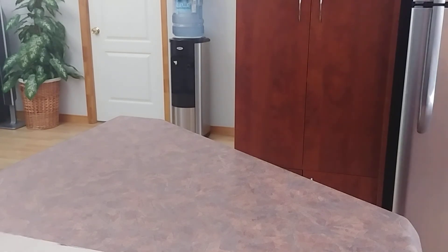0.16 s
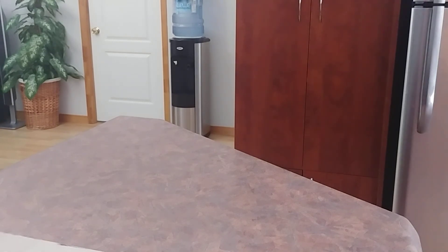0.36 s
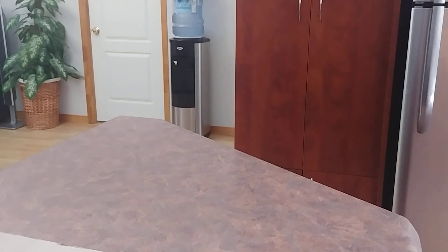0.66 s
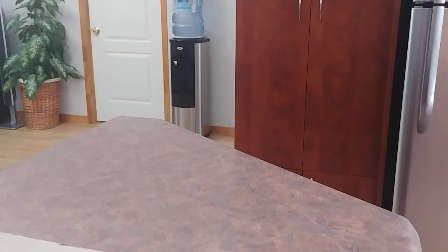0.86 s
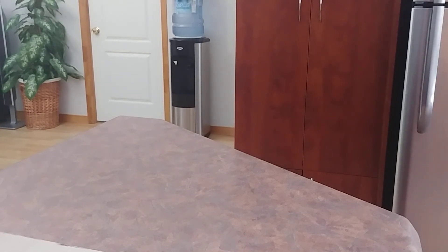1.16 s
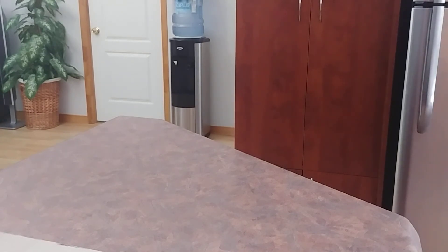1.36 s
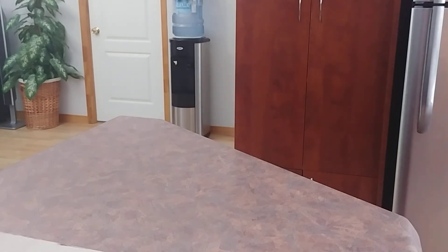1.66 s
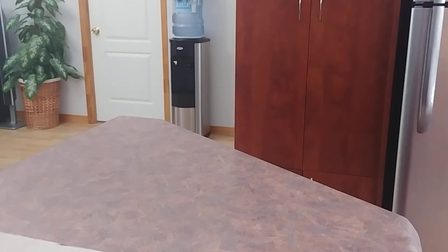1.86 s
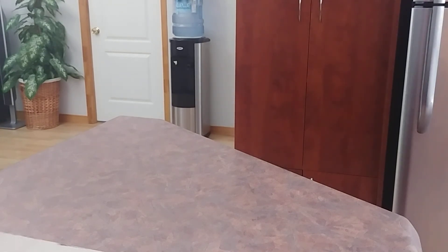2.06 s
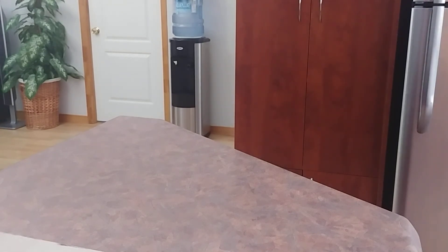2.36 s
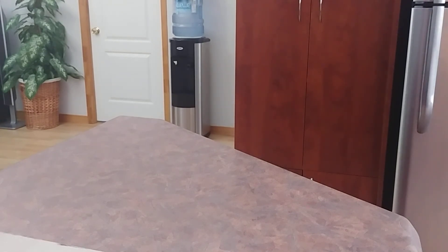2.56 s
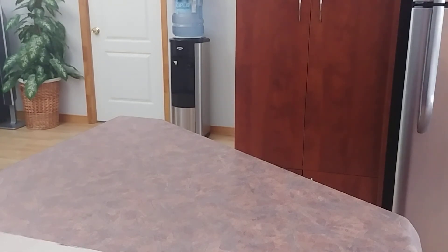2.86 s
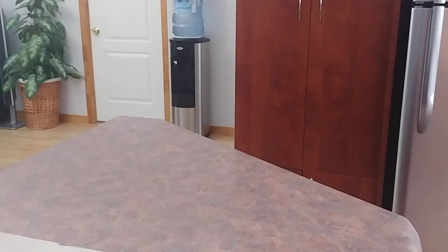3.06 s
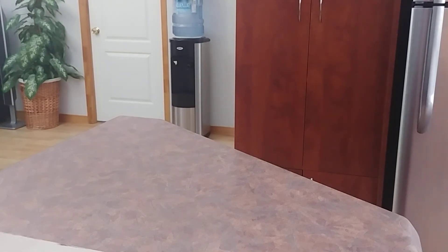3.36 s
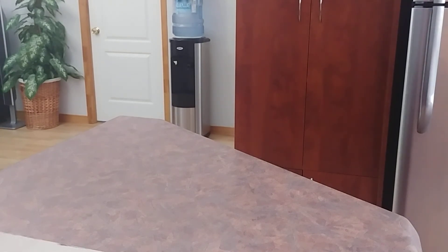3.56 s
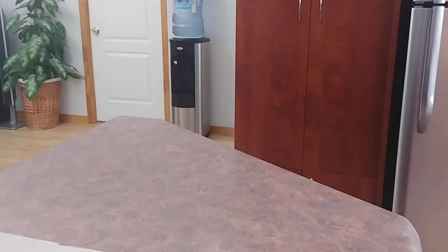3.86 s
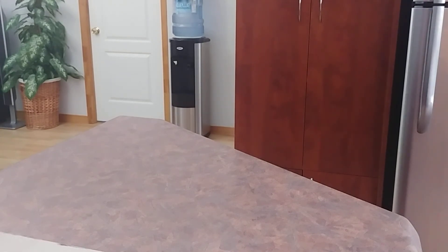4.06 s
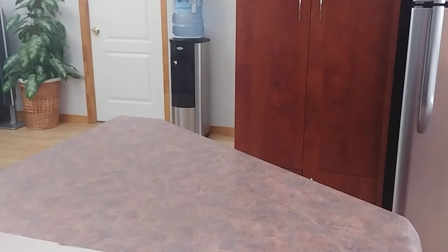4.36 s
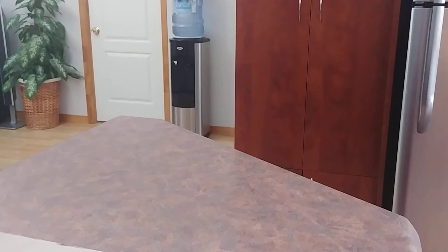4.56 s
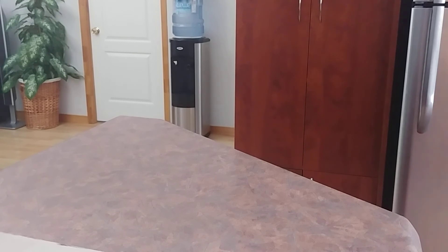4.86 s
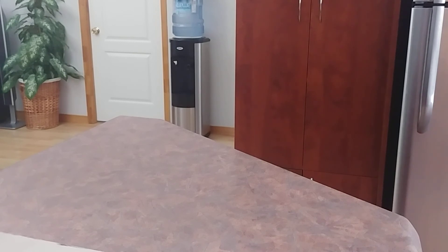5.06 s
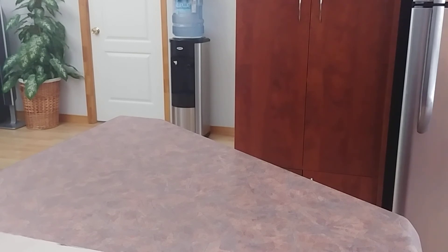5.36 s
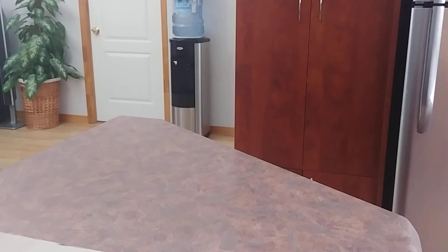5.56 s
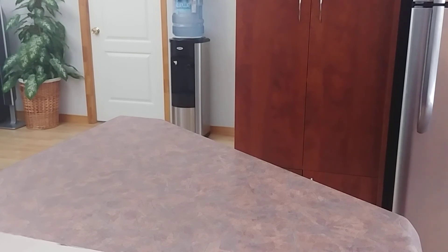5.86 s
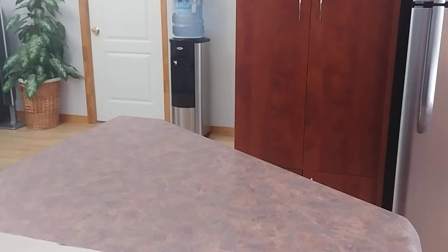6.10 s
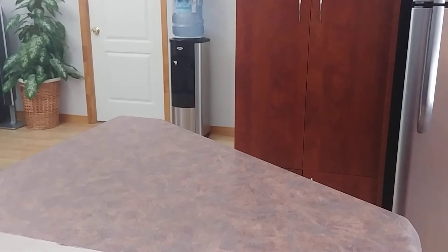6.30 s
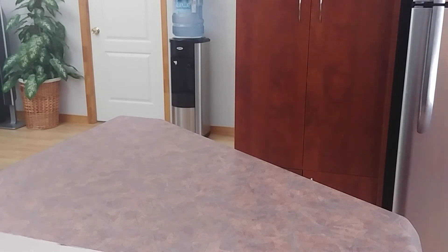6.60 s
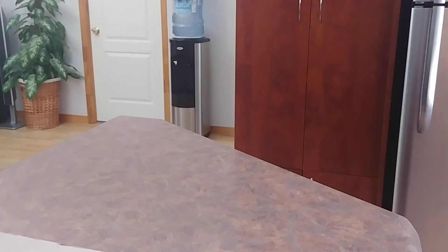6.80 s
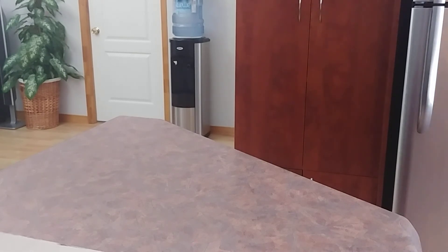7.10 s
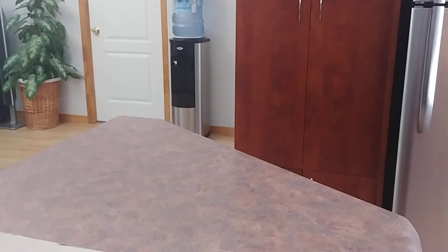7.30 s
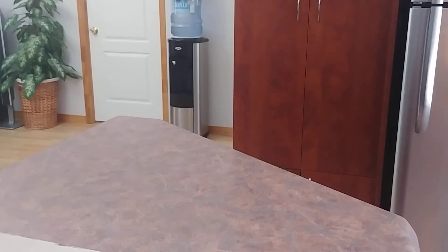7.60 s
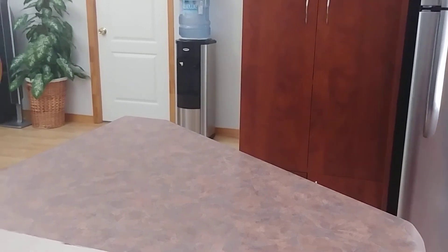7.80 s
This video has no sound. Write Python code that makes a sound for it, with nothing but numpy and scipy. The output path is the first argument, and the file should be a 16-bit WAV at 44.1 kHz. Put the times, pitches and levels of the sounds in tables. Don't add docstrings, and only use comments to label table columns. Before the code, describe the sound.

A thin metal tray is handled and set into an oven, off to the right of a small stereo microphone. Bright foil rustle and small clicks lead to three increasingly strong, rattly clunks with short metallic ringing and dull oven-wall resonance. Friction scrapes and muffled thuds fill the gaps. Afterwards come crackly rustles, a lighter knock and a few soft clacks, with a low compressor hum underneath and modest room reverberation.

```python
import sys
import numpy as np
from scipy import signal
from scipy.fft import rfft, irfft, next_fast_len
from scipy.io import wavfile
from scipy.ndimage import uniform_filter1d

SR = 44100
rng = np.random.default_rng(int(sys.argv[2]) if len(sys.argv) > 2 else 0)


def digitize_waveform(pressure):
    field = np.atleast_2d(pressure).T
    bounded = np.clip(field, -1, 1)
    quanta = np.round(bounded * 32767).astype(np.int16)
    wavfile.write(sys.argv[1], SR, quanta)


def voltage_ratio(level):
    return 10 ** (np.asarray(level, float) / 20)


N = 350154
SIZE = next_fast_len(N, True)
HZ = np.fft.rfftfreq(SIZE, 1 / SR)
TICKS = np.arange(0, N / SR + .01, .001)


def evened(x):
    return x / np.sqrt(np.mean(x ** 2) + 1e-20)


def read(points, hz):
    f, value = np.transpose(points)
    return np.interp(np.log(hz + 1), np.log(f + 1), value)


def colour(x, spectrum):
    return evened(irfft(rfft(x, SIZE) * voltage_ratio(read(spectrum, HZ)), SIZE)[..., :N])


def grains(per_s, spread_db):
    snap_db = spread_db * np.minimum(rng.exponential(1, N), 4)
    size = voltage_ratio(snap_db) * rng.choice([-1., 1.], N)
    return size * (rng.random(N) < per_s / SR)


def ring(modes, spread_db=0., longest=1.8):
    t = np.arange(SR // 2) / SR
    hz, db, t60 = np.transpose(modes)[:, :, None]
    luck = rng.standard_normal((len(modes), 1))
    decay = voltage_ratio(db + spread_db * luck - 60 * t / np.clip(t60, .03, longest))
    h = (decay * np.sin(2 * np.pi * hz * t)).sum(0)
    h = h * np.cos(np.pi * t)
    return h / np.linalg.norm(h)


def sheet():
    place, luck = rng.random((2, 110))
    hz = 620 + 4800 * np.sort(place)
    return ring(np.transpose([hz, -2.5 * hz / 1000, 0.13 + 0.29 * luck]), spread_db=2.0)


def metallic(x, share_db):
    body = np.broadcast_to(sheet(), x.shape[:-1] + (SR // 2,))
    ringing = signal.oaconvolve(x, body, axes=-1)[..., :N]
    return evened(x + voltage_ratio(share_db) * ringing)


def spells(start, db, rise, hold, fall, power=1):
    t = TICKS[:, None]
    early = np.maximum(start - t, 0)
    late = np.maximum(t - start - np.abs(hold), 0)
    away = early / np.maximum(rise, .002) + late / np.maximum(fall, .01)
    events = voltage_ratio(db - 20 * away ** power)
    return (events ** 2).sum(1)


def over_bed(power, bed_db):
    return np.interp(np.arange(N) / SR, TICKS, np.sqrt(power + voltage_ratio(2 * bed_db)))


# (frequency [Hz], correlation [1])
LIKENESS = [(60, 0.84), (150, 0.97), (380, 0.49), (950, 0.37), (2380, -1.7), (5980, 0.2), (15000, -1)]


def diffuse(a, b):
    same = np.clip(read(LIKENESS, HZ), 0, 1)
    a, b = rfft(a, SIZE), rfft(b, SIZE)
    return irfft(np.array([a, same * a + np.sqrt(1 - same ** 2) * b]), SIZE)[:, :N]


# (frequency [Hz], t60 [s])
REVERB = [(100, 0.74), (500, 0.51), (2000, 0.46), (8000, 0.24)]


def room(x, wet_db):
    taps = np.zeros((2, SR // 2))
    at = np.arange(100, SR // 2 - 20, 20)
    at = at + rng.integers(0, 20, (2, len(at)))
    np.put_along_axis(taps, at, rng.choice([-1., 1.], at.shape), 1)
    hz, t, z = signal.stft(taps, SR, nperseg=256)
    decay = voltage_ratio(-60 * t / read(REVERB, hz)[:, None])
    tail = signal.istft(z * decay, SR, nperseg=256)[1]
    tail = diffuse(*tail)[:, :SR // 2]
    tail /= np.linalg.norm(tail[0])
    wet = signal.oaconvolve(np.atleast_2d(x), tail, axes=1)[:, :N]
    return (x + voltage_ratio(wet_db) * wet) / np.sqrt(1 + voltage_ratio(2 * wet_db))


SHAFT_ORDERS = [-56, -65.5, -56.5, -60, -68, -67, -71.5, -82, -95, -91, -73.5, -78.5, -85.5, -80]
# (frequency [Hz], level [dB])
MOTOR_BUZZ = (120, -58.5)
# (frequency [Hz], level per Hz [dB])
AIR_NOISE = [(40, -4.5), (70, -14.5), (125, -14), (200, -5.5), (270, -2), (400, -20.5), (700, -16.5),
             (1300, -42), (2100, -26), (5600, -36.5), (16000, -52)]


def fridge():
    t = np.arange(N) / SR
    shaft_hz = 44.05
    lines = [(shaft_hz * (k + 1), db) for k, db in enumerate(SHAFT_ORDERS)] + [MOTOR_BUZZ]
    hum = np.zeros(N)
    for hz, db in lines:
        waver = np.interp(t, np.arange(90) / 10, rng.standard_normal(90))
        hum += np.sqrt(2) * voltage_ratio(db + 1.6 * waver) * np.sin(2 * np.pi * (hz * t + rng.random()))
    air = colour(diffuse(*rng.standard_normal((2, N))), AIR_NOISE)
    return hum + voltage_ratio(-60) * air


# (time [s], drag level [dB], thud level [dB], rise per 20 dB [s], fall per 20 dB [s])
WEIGHT_SHIFTS = [(.060, -58, -52, 0.075, 0.22), (.405, -55, -38.5, 0.092, 0.076),
                 (.664, -67, -57, 0.4, 0.28), (.932, -67, -46, 0.027, 0.098),
                 (1.514, -37.5, -42.5, 0.018, 0.33), (1.666, -38.5, -40, 0.11, 0.33),
                 (2.070, -41.5, -41, 0.52, 0.53), (2.61, -24, -24, 0.025, .15),
                 (2.760, -33.5, -49, 0.21, 0.21), (2.850, -33.5, -35.5, 0.14, 0.23),
                 (3.215, -51.5, -47, 0.03, 0.95), (3.372, -41.5, -42, 0.25, 0.064),
                 (3.661, -32.5, -26.5, 0.01, 0.3), (3.888, -31, -26.5, 0.051, 0.13),
                 (4.111, -46, -41.5, 0.27, 0.43), (4.693, -60.5, -45.5, 1, 0.98),
                 (5.090, -42, -43.5, 0.15, 0.34), (5.442, -48, -42, 0.36, 0.38),
                 (6.164, -57.5, -46.5, 0.28, 0.21), (6.670, -49.5, -39, 0.092, 0.079),
                 (6.790, -56.5, -44, 0.12, 0.21), (7.350, -54.5, -42.5, 0.25, .12),
                 (7.659, -52, -36.5, 0.052, 0.11), (7.742, -46.5, -37.5, 0.21, 0.11)]


def shifting(column, idle_db):
    rows = np.transpose(WEIGHT_SHIFTS)
    power = spells(rows[0], rows[column], rows[3], 0, rows[4], 1.06)
    return over_bed(power, idle_db)


# (frequency [Hz], level [dB], t60 [s])
FLOOR_MODES = [(61, -2.5, 0.84), (126.7, -6.5, 0.44), (134.2, 9.5, 0.78), (88, -18, 0.28),
               (171.4, -5, 0.335), (250.3, 1.5, 0.23)]


def thuds():
    shaken = signal.oaconvolve(grains(400, 1.94), ring(FLOOR_MODES, longest=0.095))[:N]
    return voltage_ratio(-1.5) * shifting(2, idle_db=-60.5) * evened(shaken)


# (frequency [Hz], level [dB], t60 [s])
WALL_MODES = [(333, -7, 0.6), (350, -1.5, 0.7), (309, -15, 0.6), (265, -11, 0.33)]
# (time [s], level [dB], hold [s], fall per 20 dB [s])
WALL_SPELLS = [
    (1.54, -45, 0.0077, -0.5),
    (1.722, -40.5, 0.23, -0.13),
    (2.086, -48, .01, 0.8),
    (2.625, -33.5, 0.13, 0.24),
    (2.91, -39, .01, 0.3),
    (3.67, -31.5, 0.012, .5),
    (3.896, -42.5, .01, 0.93),
    (4.630, -54.5, 0.0081, 1.4),
    (5.21, -50.5, .01, 0.4),
    (5.456, -51.5, .01, 0.2),
]


def wall():
    shaken = signal.oaconvolve(grains(70, 2.7), ring(WALL_MODES[:3], longest=.8))[:N]
    level = np.sqrt(uniform_filter1d(shaken ** 2, size=6000) + 1e-12)
    s, db, hold, fall = np.transpose(WALL_SPELLS)
    gain = over_bed(spells(s, db, 0.041, hold, fall), -74)
    return voltage_ratio(-4.0) * gain * shaken / level


# (time [s], level
# [dB], frequency [Hz], bandwidth [Hz], t60 [s])
KNOCKS = [(0.106, -49.5, 1410, 220, 0.22), (0.41, -54, 1430, 300, 0.11), (0.767, -39, 3020, 540, 0.12),
          (1.15, -34, 2830, 500, 0.13), (2.488, -43, 2200, 400, .25), (1.772, -46, 4000, 350, 0.22),
          (1.89, -44, 2040, 270, 0.61), (2.17, -47, 2800, 130, 0.56), (2.48, -42, 5270, 500, 0.22),
          (2.612, -29, 2920, 370, .2), (4.93, -38, 3020, 350, 0.44), (7.245, -52, 5050, 900, 0.34),
          (3.868, -23, 2600, 1800, 0.1), (2.15, -49, 3630, 200, 2.), (2.822, -30, 4640, 970, 0.19),
          (1.94, -44.5, 1245, 80, 1.5), (4.48, -54.5, 497, 140, 3.1), (4.265, -41, 1750, 700, 0.3),
          (4.27, -38.5, 3580, 1000, 0.37), (4.40, -41, 4700, 2700, 0.14), (4.902, -37, 9400, 6000, 0.15),
          (5.403, -46.5, 580, 600, 0.39), (6.566, -57.5, 4600, 1200, 0.12), (6.631, -49, 2000, 400, 0.18),
          (6.748, -33.5, 2280, 940, 0.1), (6.777, -45.5, 510, 500, 0.23), (7.593, -45.5, 600, 330, 0.2),
          (7.67, -42.5, 2950, 768, 0.29), (7.79, -46, 3200, 1800, 0.18), (1.51, -32.5, 3500, 1800, .45),
          (3.72, -27, 2400, 1510, .15), (3.872, -28, 3470, 660, .12), (5.639, -46, 5000, 5000, .1),
          (3.886, -30, 150, 120, 0.1), (3.665, -28, 330, 200, 0.23), (0.94, -41, 4860, 700, .2),
          (2.629, -39, 61, 12, 1.4), (3.8, -42, 61.9, 12, 1.5),
          (1.52, -34, 2100, 400, .25), (1.55, -34, 950, 350, .5), (1.70, -45, 1440, 150, 1.),
             (1.83, -48, 2900, 1500, 1.), (1.875, -48, 3600, 400, 0.33), (2.49, -43, 3400, 450, .6),
             (2.825, -33, 1200, 700, .2), (2.85, -36, 2400, 500, .2), (3.88, -32.5, 1375, 150, 0.37),
             (4.19, -50, 1350, 120, .5), (4.345, -56, 1154, 120, .3), (6.775, -46.5, 2400, 900, 0.2),
             (3.655, -25, 829, 60, .45), (3.657, -27, 1390, 130, .4), (3.66, -27, 1700, 70, .4),
             (3.655, -27, 2120, 80, .35), (3.66, -27, 2430, 70, .4), (3.655, -27, 2680, 130, .35),
             (3.658, -25, 150, 90, .2), (3.878, -25, 130, 60, .22), (2.61, -26, 150, 80, .3),
             (1.565, -36, 150, 80, .3), (2.685, -31, 345, 70, .2), (2.594, -30, 3500, 4000, .15),
             (4.62, -61, 650, 350, 1.), (3.262, -40, 4000, 3000, .3), (3.19, -42, 7600, 900, .5)]


def clacks():
    events = KNOCKS
    u, out = np.arange(SR // 3) / SR, np.zeros(N + SR)
    noise = rng.standard_normal((len(events), len(u)))
    for (s, db, hz, width, t60), puff in zip(events, noise):
        band = signal.iirpeak(hz, hz / width, SR)
        knock = evened(signal.lfilter(*band, signal.lfilter(*band, puff)))
        force = voltage_ratio(db - 60 * u / t60) * (1 - np.exp(-u / (0.025 * t60)))
        out[round(s * SR):][:len(u)] += force * knock
    return out[:N]


# (time [s], level [dB], hold [s], relative crackle level [dB])
CRINKLES = [(0.0, -45, 0.0082, -2.5), (0.108, -36, 0.011, -9), (0.253, -55, 0.029, -15),
            (0.394, -52.5, 0.017, -6), (0.59, -47.5, 0.024, -12), (0.761, -45.5, 0.017, -6.5),
            (1.016, -47.5, 0.024, -12), (1.146, -50, 0.12, -3), (1.402, -56.5, 0.023, -1.5),
            (1.503, -37, 0.073, 2.5), (2.486, -48.5, 0.083, 3.5), (2.6, -33.5, 0.041, 7.5),
            (2.826, -37, 0.057, -1), (3.188, -40, 0.015, -10), (3.212, -38, .015, -8),
            (3.653, -33, 0.038, 11), (3.870, -35, 0.034, 5.5), (4.924, -46, 0.037, -35),
            (5.062, -28, 0.0053, -6.5), (5.281, -44, 0.0042, -24), (5.575, -56.5, .005, 0),
            (5.641, -51, 0.04, -8.5), (5.785, -56.5, 0.039, -13), (6.082, -67.5, .04, 4),
            (6.751, -53, 0.029, -13), (7.624, -48, 0.044, -32)]
# (peak time [s], level [dB], swell per 20 dB [s], relative crackle level [dB])
FOLDS = [(.300, -50.5, 0.06, -2.5), (.690, -52, 0.17, -4), (.895, -49, 0.02, -3), (.938, -38, -0.02, -3.5),
         (.975, -50, -0.02, -10), (1.661, -37, 0.0131, 1.5), (1.790, -51, -0.02, 4),
         (1.980, -48.5, 0.04, 7), (2.085, -46.5, 0.07, 8.5), (2.260, -58.5, 0.32, 10.5),
         (2.400, -60, 0.2, 4), (2.92, -36.5, 0.0437, -5), (3.025, -37, 0.0452, -7),
         (3.100, -43.5, 0.04, -5.5), (3.28, -37.5, .04, -1), (3.54, -46.5, 0.06, -3),
         (3.386, -41, 0.06, 3.5), (4.015, -38, 0.1439, -28), (4.120, -42, 0.0235, 1),
         (4.290, -49.5, -0.23, 5), (4.415, -48.5, 0.13, -20), (4.569, -46.5, 0.03, -6.5),
         (4.740, -59.5, 0.1, -17), (4.975, -41, 0.06, 0), (5.030, -36.5, .05, -10), (5.12, -43, 0.04, -1),
         (5.178, -33, 0.0581, -9.5), (5.824, -51.5, 0.0848, -4), (6.164, -58, 0.08, -2),
         (6.670, -56, 0.08, -4), (6.740, -52, 0.08, -25), (7.19, -66.5, .05, -5), (7.237, -52.5, 0.01, -5),
         (7.275, -51.5, 0.03, -3), (7.315, -49.5, 0.03, 1), (7.5, -69, -0.14, 4), (7.725, -55, 0.06, 8),
         (7.816, -54.5, 0.035, 6.5)]
# (time [s], rustle level [dB])
HANDS = [(0.0, -61), (.8, -65.5), (1.08, -76), (1.47, -67.5), (1.53, -47), (1.85, -56), (2.2, -56.5),
         (2.55, -64), (2.7, -46.5), (3.501, -63.5), (3.76, -42.5), (4.48, -61.5), (4.85, -71.5),
         (5.25, -59.5), (5.55, -66), (6.4, -75.5), (7.1, -79), (7.94, -82)]


def fingers(low):
    s, db, hold, low_db = np.transpose(CRINKLES)
    snaps = spells(s, db + low * low_db, 0.015, hold, 0.07)
    s, db, swell, low_db = np.transpose(FOLDS)
    swell = np.maximum(swell, .035)
    creases = spells(s, db + low * low_db, swell, 0, swell, 2.02)
    settling = spells(s, db - 15.5, 0.11, swell, 0.23)
    busy_db = np.interp(TICKS, *np.transpose(HANDS)) + low * 3.5
    return over_bed(snaps + creases + settling, busy_db)


def patchy(x, depth_db):
    z = signal.stft(x, nperseg=256)[2]
    patches = rng.standard_normal(z.shape[:0:-1]).T
    patches = uniform_filter1d(patches, size=4, axis=0)
    patches = uniform_filter1d(patches, size=14, axis=1)
    return signal.istft(z * voltage_ratio(depth_db * evened(patches)), nperseg=256)[1][:, :N]


# (frequency [Hz], level per Hz [dB])
HISS_COLOUR = [(900, -20), (1500, -21.5), (2300, -16.5), (2900, -7), (3800, -7.5), (4800, -2.5),
               (6500, -2.5), (9000, -6), (12000, -14), (16000, -16)]
# (frequency [Hz], level per Hz [dB])
CRACKLE_COLOUR = [(900, -16), (1800, -8.5), (2600, -3), (3800, -4), (5200, -9.5), (7000, -35)]
# (frequency [Hz], level per Hz [dB])
FOIL_COLOUR = [(5000, -30), (8000, -5.5), (11000, -3), (13000, -4.5), (16000, -6)]
# (time [s], level [dB], hold [s])
FOIL_FIZZ = [(0.082, -53, .04), (.245, -63, .01), (.585, -51.5, .02), (1.015, -62, 0.028),
             (1.775, -63, .02), (3.005, -53, .02), (3.19, -54, .02), (5.058, -49.5, .02),
             (0.881, -49.5, 0.063), (1.196, -60, .02), (1.497, -40.5, 0.015), (1.636, -51, 0.018),
             (2.828, -42, .02), (2.9, -49, .04), (3.267, -51.5, .03), (3.65, -45.5, .02),
             (3.894, -47, 0.035), (4.08, -58, 0.018), (4.22, -62, .02), (4.32, -63, .02), (4.885, -56, .01),
             (4.903, -48, .06), (5.39, -64, 0.018), (5.64, -58.5, 0.014), (6.217, -71, 0.035),
             (6.48, -76, .01), (6.557, -74, 0.025), (7.235, -63, 0.054), (7.617, -56, .03)]


def rustle():
    hiss, crackle = (diffuse(grains(6000, 2.95), grains(6000, 2.41)) for _ in "ab")
    level = fingers(0)
    low = metallic(colour(crackle, CRACKLE_COLOUR), share_db=-19.0)
    low = fingers(0.93) / level * low
    both = voltage_ratio(0.5) * colour(hiss, HISS_COLOUR) + voltage_ratio(-0.5) * low
    s, db, hold = np.transpose(FOIL_FIZZ)
    fizz = over_bed(spells(s, db, .006, hold, .05), -90) * colour(hiss, FOIL_COLOUR)
    return level * patchy(both, depth_db=2.2) + fizz


# (frequency [Hz], level per Hz [dB])
DRAG_COLOUR = [(120, -22), (200, -9), (300, 1.5), (450, -6), (700, -4), (1200, -6.5), (1800, -9.5),
               (3000, -35)]
# (frequency [Hz], level [dB], t60 [s])
TRAY_MODES = [(483, -11, 0.5), (738, -7, 0.34), (829, -2, 0.26), (952, -9, 0.27), (1190, -11, 0.35),
              (1427, -6, 0.4), (1519, -8, 0.3), (1370, -1, 0.3), (1691, -5, 0.26), (1857, -9, .3),
              (2000, -11, 0.25), (679, -8, 0.33), (2120, -7, 0.3), (2213, -11, .3), (2680, -8, 0.25),
              (2430, -7, 0.3), (2980, -11, 0.3), (3150, -12, .25), (3360, -12, 0.25), (3710, -12, 0.25)]


def drag():
    level = shifting(1, idle_db=-70.5)
    scrape = colour(diffuse(grains(3000, 3.9), grains(3000, 3.3)), DRAG_COLOUR)
    rough = level * metallic(scrape, share_db=-8.0)
    slips = level * evened(grains(800, 3.6))
    body = voltage_ratio(-13.0) * ring(TRAY_MODES, longest=0.198) + voltage_ratio(-13.5) * ring(WALL_MODES)
    return voltage_ratio(-1.5) * rough + signal.oaconvolve(slips, body)[:N]


# (time [s], peak level [dB])
FIRST_TOUCHES = [(1.505, -26), (1.516, -22), (1.527, -21), (1.540, -18), (1.551, -24), (1.560, -22),
                 (1.575, -22), (1.592, -25), (1.648, -27), (1.667, -27), (1.69, -30)]
# (time [s], peak level [dB])
SECOND_TOUCHES = [
    (2.601, -11),
    (2.612, -15),
    (2.621, -8.5),
    (2.640, -21),
    (2.69, -23),
    (2.743, -28),
    (2.829, -18),
    (2.846, -25),
    (2.922, -25),
]
# (time [s], peak level [dB])
THIRD_TOUCHES = [(3.651, -15), (3.663, -13), (3.672, -10), (3.680, -13), (3.690, -14), (3.698, -16),
                 (3.708, -16), (3.722, -16), (3.735, -20), (3.762, -17), (3.869, -17.5), (3.876, -15),
                 (3.892, -19), (3.92, -22), (5.064, -24), (5.074, -23), (5.175, -25)]


def contacts():
    rows, out = np.array(FIRST_TOUCHES + SECOND_TOUCHES + THIRD_TOUCHES), np.zeros(N)
    for spot in range(3):
        ticks = np.zeros(N)
        s, db = rows[spot::3].T
        ticks[np.round(s * SR).astype(int)] = voltage_ratio(db - 7.5)
        body = ring(TRAY_MODES, spread_db=4.0, longest=0.053)[:SR // 8]
        out += signal.oaconvolve(ticks, body / np.abs(body).max())[:N]
    return out


# (frequency [Hz], level per Hz [dB])
CRACK_COLOUR = [(120, -18), (220, -8.5), (400, -16.5), (800, -2), (1400, 2.5), (2500, 0), (4000, -15.5),
                (6400, -16.5), (10000, -23.5), (16000, -41.5)]
# (time [s], blow level [dB], relative thump level [dB], rattle rise [s], rattle t60 [s])
BLOWS = [
    (1.499, -29, -38, 0.011, 0.37),
    (1.569, -30.5, -7.5, 0.01, 0.2),
    (2.597, -21, -8, 0.022, 0.11),
    (2.827, -21, -17, 0.012, 0.058),
    (2.91, -31.5, 3, 0.014, 0.051),
    (3.206, -38.5, -2.5, 0.055, 0.46),
    (3.648, -12, -23, 0.011, 0.13),
    (3.869, -19.5, -9.5, 0.008, 0.088),
    (5.065, -29.5, -13, 0.016, 0.13),
]


def clunks():
    u = np.arange(SR // 2) / SR
    rattle, crack = evened(grains(1500, 3.0)), colour(grains(7000, 2.5), CRACK_COLOUR)
    out, dense = np.zeros(N), sheet()
    for s, db, thump_db, rise, t60 in BLOWS:
        at = round(s * SR)
        force = voltage_ratio(db - 60 * u / max(t60, .02)) * (1 - np.exp(-u / max(rise, .001)))
        body = voltage_ratio(-9.0) * ring(TRAY_MODES, spread_db=-1.5, longest=0.44)
        body += voltage_ratio(-10.5) * ring(WALL_MODES, spread_db=3.0)
        body += voltage_ratio(-4.0) * dense
        body += voltage_ratio(thump_db + 3.0) * ring(FLOOR_MODES, spread_db=2)
        out[at:at + SR - 1] += signal.fftconvolve(force * rattle[at:at + len(u)], body)
        out[at:at + len(u)] += voltage_ratio(4.0) * force * crack[at:at + len(u)]
    return out


def scene():
    spread = rustle() + drag() + wall() + clacks()
    blows = clunks() + contacts()
    return room(blows, wet_db=1.0) + room(spread, wet_db=-10.0) + thuds() + fridge()


def low_pass(x):
    return signal.sosfilt(signal.butter(12, 16840, fs=SR, output="sos"), x)


# (frequency [Hz], left minus right level [dB])
PORT_LEAN = [(60, -5), (120, -5.5), (240, -4.0), (480, -7.5), (950, -6.5), (1890, -6.5), (3770, -5.5),
             (7520, -8.5), (15000, -26)]
# (frequency [Hz], level [dB])
MIC_RESPONSE = [(25, -29), (48, -12.5), (65, -1), (6600, -1), (7000, -1.5), (8600, -3), (9600, -12),
                (10500, -15), (11300, -14), (14500, -8), (15800, -10.5)]


def record(dry):
    lean = read(PORT_LEAN, HZ) / 2
    lag_s, port_hz, port_width_hz = .00018, 7700, 900
    peak_db = 9.5 / (1 + (2 * (HZ - port_hz) / port_width_hz) ** 4)
    left = voltage_ratio(lean) * np.exp(-2j * np.pi * HZ * lag_s)
    ports = voltage_ratio(read(MIC_RESPONSE, HZ) + peak_db) * np.array([left, voltage_ratio(-lean)])
    noise = voltage_ratio(-76.5) * rng.standard_normal((2, N))
    heard = (rfft(dry, SIZE) * ports + rfft(noise, SIZE)) * (HZ < 15850)
    return low_pass(irfft(heard, SIZE)[:, :N])


dry = scene()
out = record(dry)
digitize_waveform(out)
```